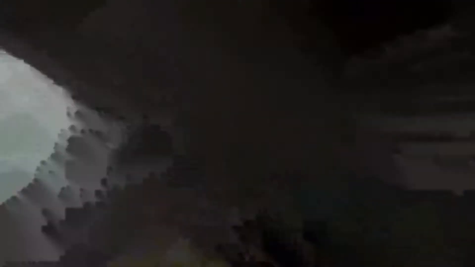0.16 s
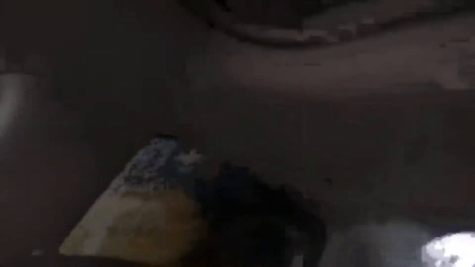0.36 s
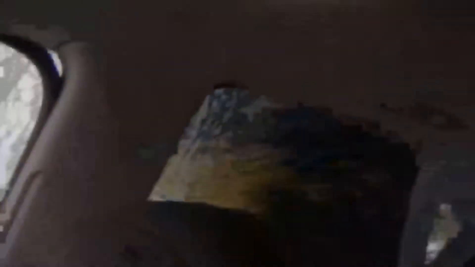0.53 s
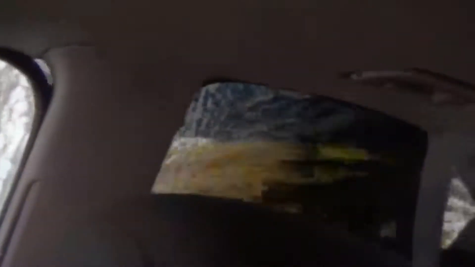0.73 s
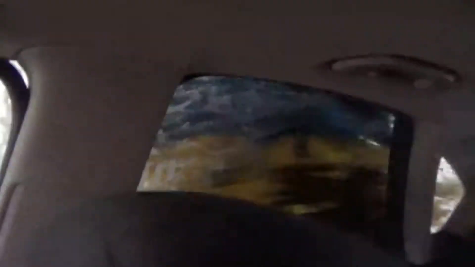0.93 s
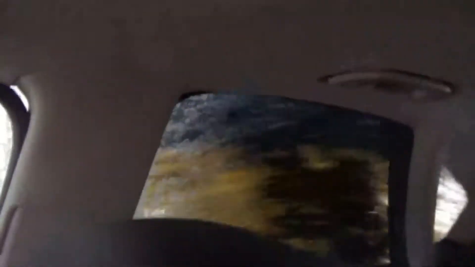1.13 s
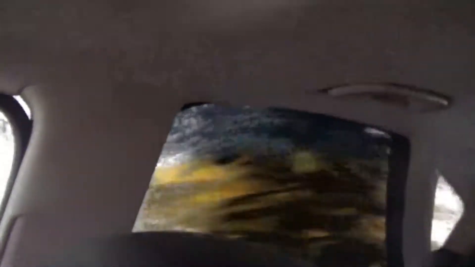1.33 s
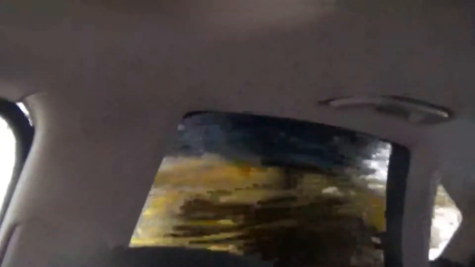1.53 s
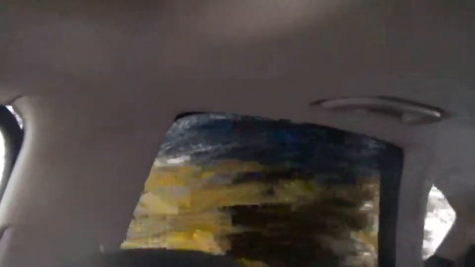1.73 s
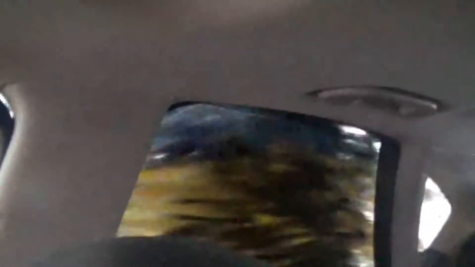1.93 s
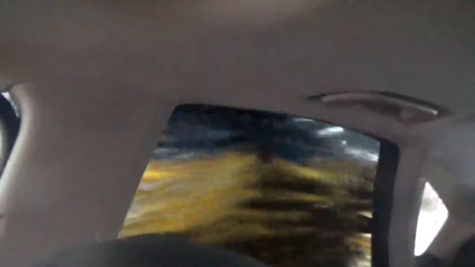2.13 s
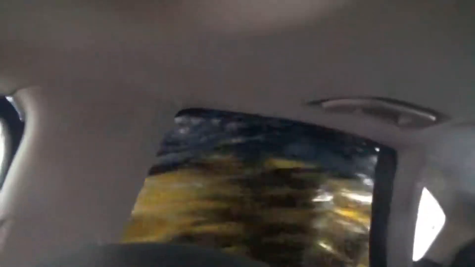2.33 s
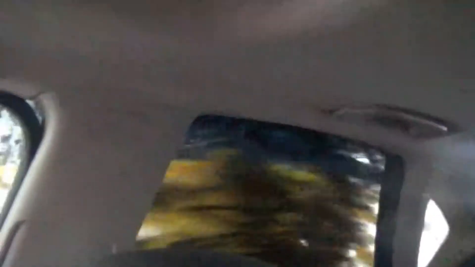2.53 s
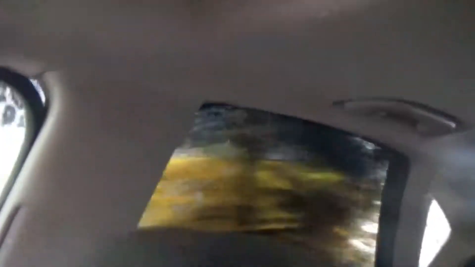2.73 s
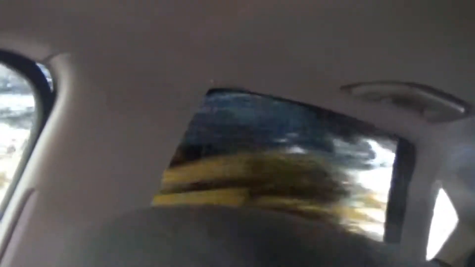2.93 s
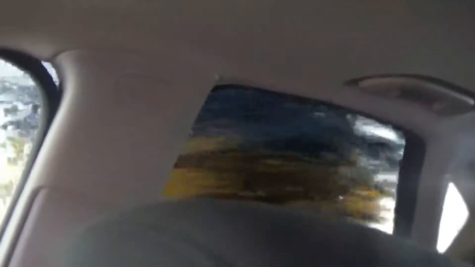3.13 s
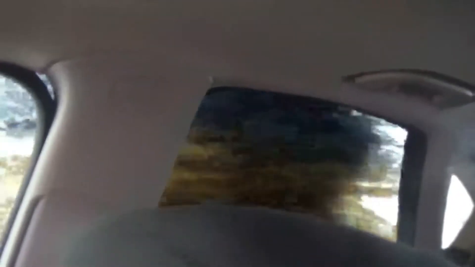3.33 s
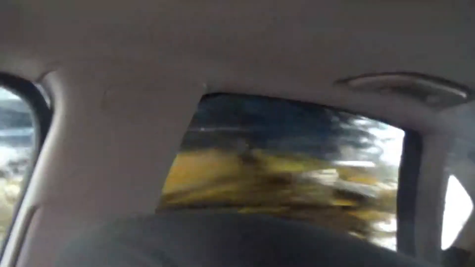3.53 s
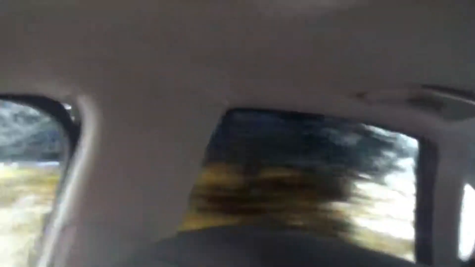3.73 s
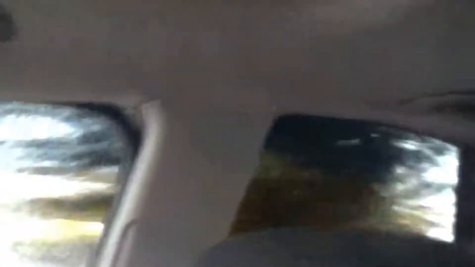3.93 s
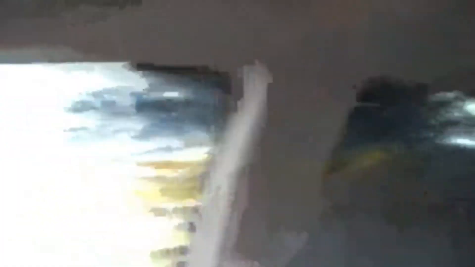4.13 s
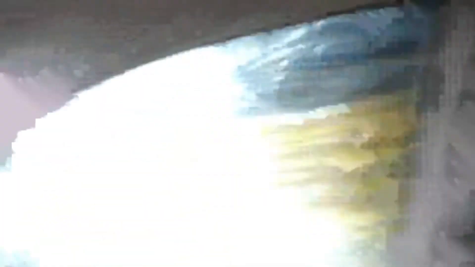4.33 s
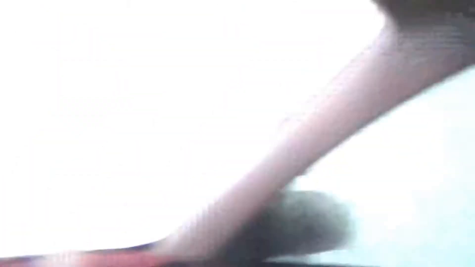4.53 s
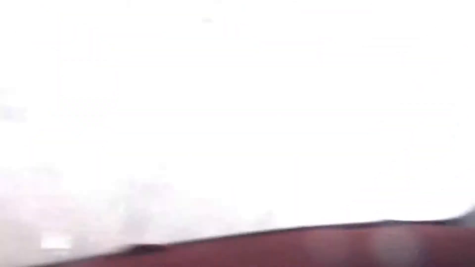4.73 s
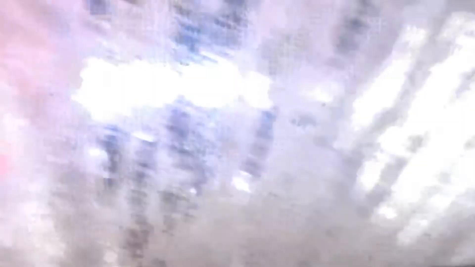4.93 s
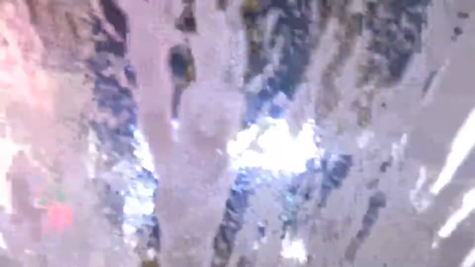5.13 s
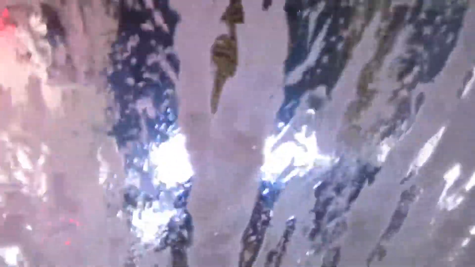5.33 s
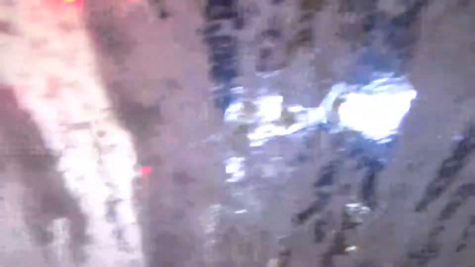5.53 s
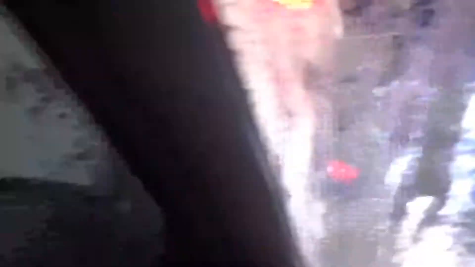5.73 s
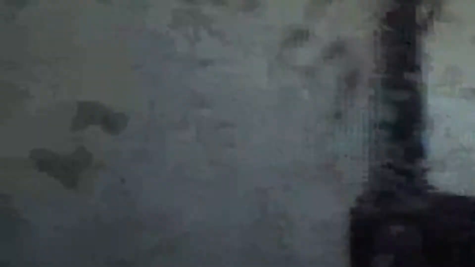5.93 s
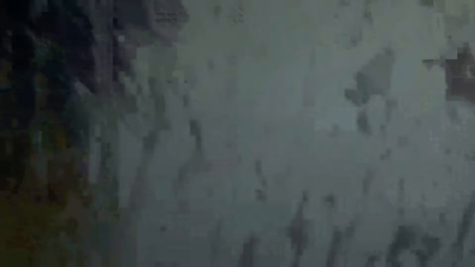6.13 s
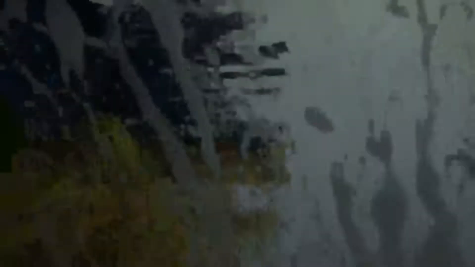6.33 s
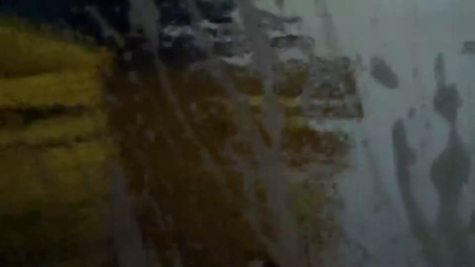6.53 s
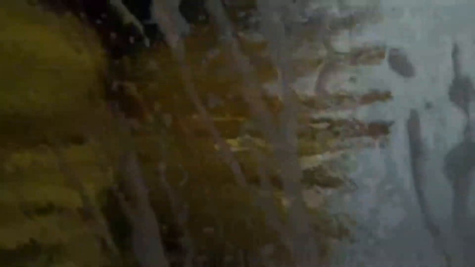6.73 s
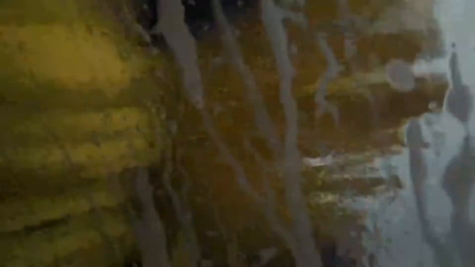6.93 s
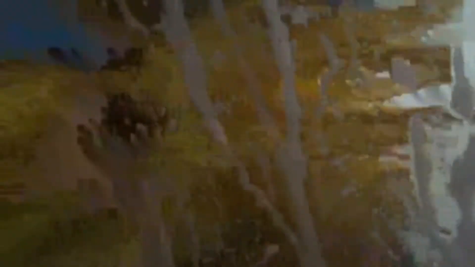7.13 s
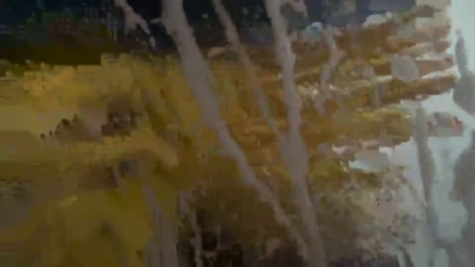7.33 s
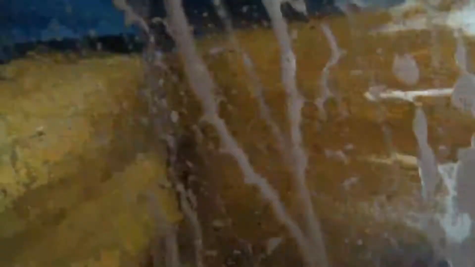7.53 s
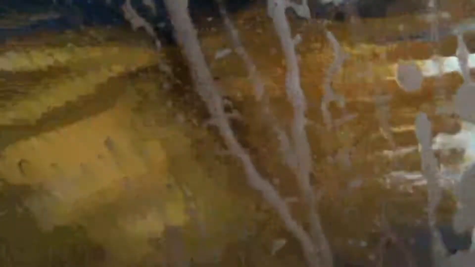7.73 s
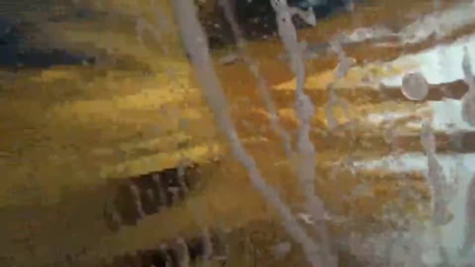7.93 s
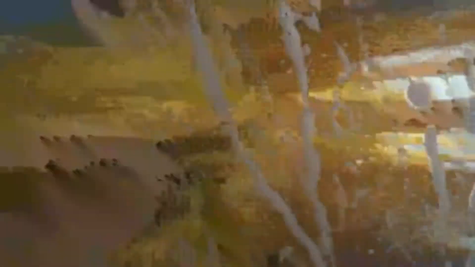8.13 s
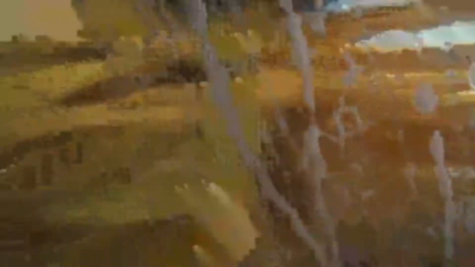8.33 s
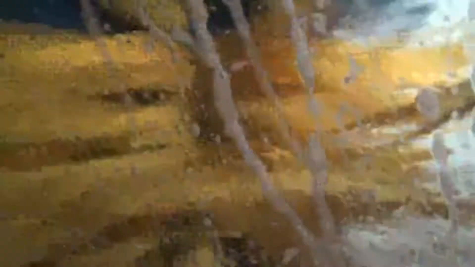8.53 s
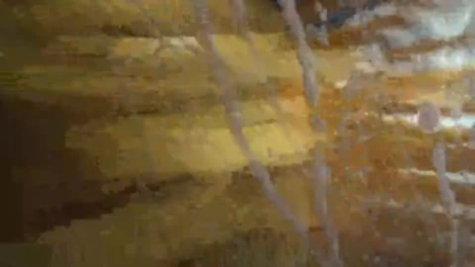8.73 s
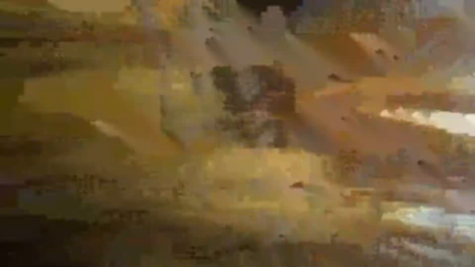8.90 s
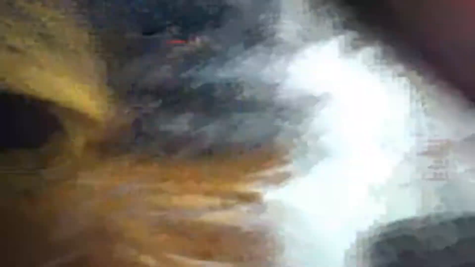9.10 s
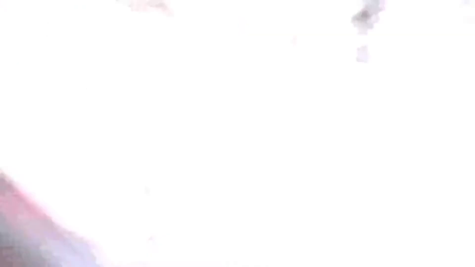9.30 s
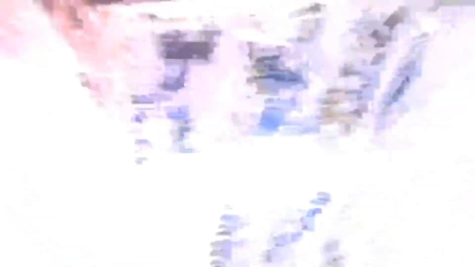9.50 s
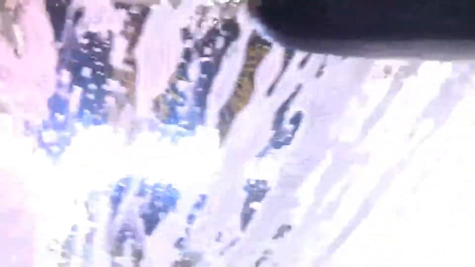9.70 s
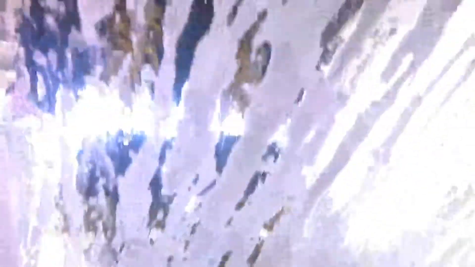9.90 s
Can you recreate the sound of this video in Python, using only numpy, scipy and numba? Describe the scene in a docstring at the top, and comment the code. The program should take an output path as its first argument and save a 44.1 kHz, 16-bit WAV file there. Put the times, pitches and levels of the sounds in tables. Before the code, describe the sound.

Inside a closed car in an automatic wash, heavy cloth strips drum the body and slap the wet rear glass with sharp snaps and crackling drops. Midway they lift off, leaving faint rustles, splashes and dry plastic ticks. Brushes then rub the door and side window, softer and duller. Low throb and running water continue beneath. Close, dense stereo handheld microphone in the cabin, loud moments squashed.

```python
"""Inside a car in an automatic wash. First, spinning cloth brushes beat the body: filtered noise drums the panels and
cabin air, strips slap, knock and scrub the wet rear glass, many slaps open with a sharp snap, drops crackle.
Midway the brushes lift off: softer rustles and splashes, and a few dry plastic ticks, modes plus a crack of noise.
Then the side brush meets the door and side glass with a softer spatter; one more tick comes near the end.
A low throb and running water, both shaped noise, last throughout; a compressor holds the level down."""
import sys
import numpy as np
from scipy import signal
from scipy.fft import rfft, irfft, next_fast_len
from scipy.io import wavfile
from scipy.ndimage import uniform_filter1d
from numba import njit

SR = 44100
rng = np.random.default_rng(int(sys.argv[2]) if len(sys.argv) > 2 else 0)


def transcribe(signal):
    """Save signal, clipped to [-1, 1], as a 16-bit WAV file at the path in sys.argv[1]."""
    frames = np.atleast_2d(signal).T
    limited = np.clip(frames, -1, 1)
    pcm = np.round(limited * 32767).astype(np.int16)
    wavfile.write(sys.argv[1], SR, pcm)


N = 439236

# Levels in the tables are relative, before the trims of each layer.
# brush contact: time_s, level_db, then over that level: door_boom_db, knock_db, scrub_db, spray_db, floor_shake_db
BRUSH_CONTACT = [(0.0, -15, -2.5, -2.5, -10, -11, -6), (0.45, -16, -2.5, -3, -13, -21, -7),
                 (0.8, -10.5, -4.5, -6, -16, -22.5, -7.5), (1.4, -14.5, -2.5, -3, -12, -13.5, -11.5),
                 (2.05, -13, -6.5, -6.5, -16, -21, -12), (2.2, -15, -10, -6.5, -14, -14, -13),
                 (2.8, -12, -8, -2.5, -16, -21.5, -9.5), (3.3, -13, -12, -1, -13, -32, -16.5),
                 (3.7, -12.5, -14.5, -4, -14, -21.5, -19), (4.2, -14.5, -2, -2.5, -11, -19, -11),
                 (4.7, -16, -8.5, -2, -10, -15.5, -4.5), (4.85, -20.5, -2, -3, -14, -24, -2),
                 (5.1, -26, -4, -2.5, -12.5, -17, -8.5), (5.33, -34, -0.5, -3.5, -17, -14, -2),
                 (5.75, -39, -2, -19, -9, 1, -6), (5.95, -33, 1, -14, -16, -15.5, -12),
                 (6.07, -31.5, -5.5, -12, -13, 0.5, -12), (6.12, -25, -3, -8, -23, -17, -11),
                 (6.19, -19, -0.5, -8, -21, -25, -9), (6.45, -20, 1, -1.5, -12, -45, -9),
                 (6.75, -19, -1.5, 4, -5, -12, -2), (7.0, -22.5, 4, 0, -8.5, -22, -11),
                 (7.35, -21, -3, -2, -15, -46, -8), (7.55, -23.5, 0.5, -0.5, -11, -28, -8),
                 (7.75, -20, 0, -3, -13.5, -43, -9), (7.95, -19.5, 1, -1.5, -12, -26, -9),
                 (8.25, -15.5, -0.5, -4.5, -14.5, -37, -18), (8.85, -16.5, 0, -5.5, -16.5, -17.5, -7),
                 (9.3, -22.5, 2.5, 0.5, -12.5, -41, -3.5), (9.45, -20.5, -4, -4, -13.5, -22, -14),
                 (9.7, -22, -2.5, -2, -13, -25, -4), (9.96, -19, -1.5, 0.5, -14.5, -15.5, -11)]
# random wander of the contact: nominal spread_db for drumming, door boom, knock, scrub, spray, floor shake
WANDER_DB = [1.36, 0.76, 1.36, 1.3, 5.2, 2.6]
WANDER_HZ = 14.0  # changes per second
# the drumming and knocking dip, or now and then lift, briefly: centre_s, change_db
DIPS = [(0.845, -7.5), (1.008, -7), (1.66, 1), (2.503, -4.5), (2.836, -8), (2.989, -11), (3.31, -5),
        (3.41, -5), (3.705, -4), (3.951, -8), (4.265, -6), (4.804, -9), (4.945, -8), (5.03, -1), (5.17, -4),
        (7.321, -4), (7.491, -4), (7.812, -7), (9.233, 1), (9.362, -2), (9.928, -8)]
DIP_S = 0.013  # from the centre to 1/e of the change in dB
# the stereo balance turns: time_s, left_minus_right_db (each layer takes a share)
BALANCE = [(0.0, 4), (0.3, -1), (0.41, 5.5), (3.61, -8), (4.47, 0.5), (5.57, 1), (6.08, -7), (6.21, -10.5),
           (9.1, -10), (9.35, 0), (9.96, 4)]
# how far the two channels differ: pitch_hz, side_under_mid_db
APART = [(25, -24), (110, -27.5), (190, -7.5), (350, -7.5), (620, -4.5), (1120, -5.5), (2000, -7.5),
         (3600, -7), (6450, -7.5), (11600, -12.5)]

# resonances of panels and cabin air: pitch_hz, width_hz, level_db
CABIN = [(121.4, 33.5, -1.5), (173.3, 22.5, -2.5), (209, 29.2, -1), (257.3, 34, 1), (319.4, 52, 0.5),
         (373.2, 67, -1), (491, 55, -7), (640, 198, -13.5)]
# resonances of the door: pitch_hz, width_hz, level_db
DOOR = [(134.8, 8.9, 6.5), (159, 13.5, 0.5), (180, 10.5, 1.5)]
# resonances of the side glass: pitch_hz, width_hz, level_db
SIDE_GLASS = [(69.6, 8.7, 1.5), (310.8, 13, 7.5), (271, 17, 0.5), (377, 19, 0.5), (496, 20, -2.5)]
# the brush moves over the side glass: time_s, glass_ringing_over_brush_level_db
ON_GLASS = [(5.8, -13), (6.4, -5), (7.0, 0), (7.5, -7.5), (8.0, 0), (8.5, -2.5), (8.9, -6), (9.4, -4),
            (9.96, -0.5)]
DOOR_FROM_S = 5.8  # wet sounds take the colour of the door from here
# resonances of the floor: pitch_hz, width_hz, level_db
FLOOR = [(25, 8.8, -7), (46.2, 25.5, -2.5), (67.4, 10.3, 5.5), (88.6, 12.3, 4.5)]

# colour of knocks at the rear: pitch_hz, level_db
KNOCK_REAR = [(240, -42), (400, -0.5), (465, -3.5), (974, -6), (1700, -18.5), (2210, -57), (3740, -120)]
# colour of knocks on the door: pitch_hz, level_db
KNOCK_DOOR = [(240, -33), (400, -2.5), (483, -1), (593, -6.5), (962, -12), (1130, -11), (1600, -23.5),
              (1700, -28), (2210, -45), (3740, -120)]
# colour of scrubbing on the rear window: pitch_hz, level_db
SCRUB_REAR = [(820, -15), (1400, -3), (1690, -1), (1880, 1.5), (2230, -4), (2730, -4), (4400, -21.5),
              (5720, -28), (9680, -120)]
# colour of scrubbing on the door: pitch_hz, level_db
SCRUB_DOOR = [(820, -13), (1400, -8), (1580, 1.5), (1840, -4), (2910, -7), (4400, -23), (5720, -47),
              (9680, -120)]
# colour of thrown water: pitch_hz, level_db
SPRAY = [(2240, -1), (3800, 3.5), (5350, -10.5), (9420, -4), (10600, -20), (11300, 3), (11500, -44),
         (15000, -72), (22000, -120)]

# strips that ring one patch of panel or window: start_s, level_db, pitch_hz
KNOCKS = [(0.191, -13, 573), (0.541, -2.5, 703), (0.841, -5, 940), (1.093, -9, 725), (1.186, -7, 657),
          (1.482, -3, 740), (1.629, -3, 730), (1.675, -11, 1290), (1.838, -3, 663), (1.937, -5, 530),
          (1.967, -5, 684), (2.128, -4, 663), (2.149, 0.5, 894), (2.319, -7, 762), (2.392, -3, 686),
          (2.533, 0, 740), (2.568, -3, 970), (2.637, 1.5, 817), (2.843, -15, 870), (3.006, -5, 475),
          (3.112, -6, 560), (3.171, -5, 840), (3.255, -3.5, 1230), (3.491, -16, 730), (3.556, -9, 853),
          (3.762, -7, 850), (4.185, -3.5, 920), (4.265, -8, 700), (4.506, -7, 614), (4.578, -7, 500),
          (4.882, -15, 577), (4.964, -17, 759), (4.985, -11, 430), (4.911, -4.5, 149), (5.086, -18, 417),
          (5.104, -13, 637), (5.137, -9, 328), (5.305, -16, 384), (6.4223, -14, 1160), (6.4742, -13, 1112),
          (6.506, -9, 1150), (6.52, -9.5, 1340), (6.628, -18, 1230), (6.668, -9, 720), (6.666, -11, 1090),
          (6.6912, -13, 1340), (6.73, -1.5, 1155), (6.74, -9, 1180), (6.784, -5, 1220), (6.8443, -4, 1180),
          (6.81, -10, 1320), (6.8871, -12, 1230), (6.919, -9, 1390), (6.921, -5, 706), (6.953, -11, 1156),
          (6.9776, -8, 1156), (6.985, -4, 690), (6.99, -12, 1114), (7.0725, -16, 1095), (7.123, -17, 1370),
          (7.1545, -19, 990), (7.222, -8, 1180), (7.2466, -12, 1130), (7.249, -11, 1595), (7.329, -14, 690),
          (7.35, -14, 1075), (7.371, -16, 1280), (7.5194, -20, 1060), (7.552, -18, 1030),
          (7.5742, -12, 895), (7.6375, -11, 1180), (7.655, -22, 1130), (7.6858, -15, 1060),
          (7.7711, -22, 1180), (7.8263, -15, 1080), (7.8873, -17, 1180), (7.9224, -8, 1137),
          (7.947, -9, 1065), (7.95, -7, 710), (7.962, -12, 1190), (7.986, -16, 1950), (8.0085, -2, 1167),
          (8.022, -12, 1230), (8.075, -10, 1170), (8.1933, -15, 1110), (8.21, -9, 1210), (8.2405, -17, 990),
          (8.2693, -8, 1140), (8.361, -7, 1090), (8.4191, -15, 1000), (8.4587, -20, 1100),
          (8.494, -18, 1180), (8.5594, -11, 1150), (8.6095, -12, 1100)]
# modes of a struck patch: pitch_ratio, level_db
PATCH_MODES = [(1, -0.5), (1.38, -6.5), (0.615, -7), (1.12, -10)]
KNOCK_MS, MODE_DB, PATCH_DETUNE = 11.6, -7.5, 0.16  # three times the rise; strongest mode; full range of ratio
KNOCK_ROUGH_DB, KNOCK_GRAIN_HZ = 3, 350.2  # cloth drags unevenly: nominal spread, changes per second

# colour of flung drops: pitch_hz, level_db
DROPS = [(1200, -30), (2500, 0.5), (4000, -5.5), (6000, -15.5), (9000, -21), (11000, -23), (13000, -30)]
DROPS_PER_S, DROP_DB, DROP_SCATTER_DB, DROP_MS = 300, -14, 5, 0.88  # the last is the fade to 1/e

# colour of water running off: pitch_hz, level_db
RUNNING_WATER = [(290, -32), (500, -1), (817, -2), (1560, -17), (4220, -37), (4620, -27), (7660, -29),
                 (11000, -25), (14300, -53), (22000, -120)]
# resonance of the low throb: pitch_hz, width_hz, level_db
THROB = [(28, 5, 0)]
WATER_DB, THROB_DB = -45, -37  # rms levels before the compressor

# slaps of strips, loud to faint, with softer rustles and splashes in the lull:
# time_s (just before the peak), level_db, wet_top_db, crack_hz, length_ms (scaled per part), body_db
SLAPS = [(0.0667, -4, -16, 1820, 6.4, 0), (0.0994, -16, -14, 2010, 6.6, 2),
         (0.1366, -16, -3.5, 2740, 8.7, 2), (0.1494, -19, -5, 2460, 9.7, 4),
         (0.218, -9.5, -22, 2440, 12, 2), (0.2399, -19, -8, 2150, 6.3, 0), (0.3177, -25, -12, 1980, 8, 2),
         (0.3371, -11, -15, 1850, 7.2, 2), (0.558, -20, -8, 2400, 4, 0), (0.5891, -12, -12, 1820, 8, -1),
         (0.6654, -12, -13, 1850, 11, 2), (0.7094, -20, -12, 1910, 8, 2), (0.739, -15, -13, 2400, 6, 2),
         (0.7706, -1.5, -28, 2620, 12.3, 5), (0.8194, -14, -12, 2360, 12.5, 5),
         (0.856, -25, -15, 2880, 7.2, 2), (0.8724, -5.5, -16, 2440, 6.7, -3), (0.885, -19, -4, 2600, 4, 0),
         (0.9193, -30, -17, 1860, 7, 0), (1.0221, -29, -22, 2680, 8, 2), (1.068, -10, -16, 2370, 7.3, -6),
         (1.1194, -26, -19, 1810, 8, 0), (1.1867, -22, -14, 2050, 10, 2), (1.2012, -12, -9, 2400, 6, 2),
         (1.2251, -8.5, -16, 2490, 9.3, 8), (1.2496, -10.5, -9, 3370, 6.8, 10),
         (1.3304, -11.5, -15, 2940, 11, 2), (1.3633, -8, -19, 1810, 8, 0), (1.4117, -8, -27, 1830, 17, 9),
         (1.5194, -10, -13, 1800, 8, 0), (1.5825, -9, -26, 3300, 8.8, 1), (1.635, -17, -10, 2400, 8, 0),
         (1.726, -15, -15, 3600, 8, 0), (1.786, -23, -17, 2600, 7.2, 0), (1.857, -9.5, -4.5, 2450, 7.4, 4),
         (1.866, -8, -18, 2600, 10, 5), (1.8966, -9, -18, 2470, 5, 6), (1.918, -9, -22, 2200, 5, 2),
         (1.953, -18, -12, 3000, 20, 0), (1.985, -18, -7, 3200, 5, 0), (2.0, -18, -15, 2500, 7.1, 2),
         (2.045, -24, -16, 3000, 7.1, 0), (2.0855, -7, -32, 2630, 8.9, 5), (2.152, -11, -17, 2860, 6.4, 10),
         (2.1735, -21, -5, 2400, 6, 2), (2.2696, 2, -23, 1850, 5.2, -5), (2.36, -12, -20, 2520, 18, -2),
         (2.4399, -13, -14, 2400, 6, 5), (2.4798, -11, -23, 3150, 3.7, 13), (2.5272, -18, -18, 2360, 5, 2),
         (2.5706, -12, -19, 1870, 9.8, 2), (2.615, -6.5, -17, 2780, 13, 10),
         (2.6918, -13, -22, 2520, 13, 2), (2.7766, -9.5, -35, 2530, 17, -2),
         (2.8983, -16, -21, 2510, 18, 6), (2.9294, -9.5, -13.5, 2000, 21, 11),
         (2.8047, -12, -31, 2600, 7.2, 0), (2.978, -19.5, -23, 3300, 8.2, 0),
         (3.0011, -21, -26, 2480, 7.2, 2), (3.024, -23, -21, 2800, 6.3, 0),
         (3.1188, -27, -12, 4500, 4.2, 0), (3.136, -23, -7, 2600, 10, 2), (3.1716, -12, -14, 2480, 8.9, 2),
         (3.186, -13, -18, 2580, 6.2, 4), (3.2321, -13, -13, 2600, 8.3, 2), (3.284, -9, -17, 2400, 11, 9),
         (3.3802, -14, -16, 2820, 7.3, 16), (3.391, -7, -30, 2530, 7.7, 0),
         (3.4406, -17, -11, 2970, 5.8, 2), (3.4565, -6, -31, 2370, 5.5, -4),
         (3.5627, -9, -5.5, 2530, 9.3, -2), (3.6731, -7.5, -26, 2660, 6.1, 4),
         (3.7264, -19, -11, 2490, 8, 2), (3.7758, -9.5, -16, 2160, 11, -1),
         (3.8227, -7.5, -20, 2530, 13, 6), (3.9275, -2.5, -12, 2660, 5.9, 0),
         (3.9694, -8, -29, 2100, 6.6, 6), (4.0417, -3.5, -27, 1850, 7.8, -2),
         (4.0946, -5, -22, 2070, 14, 3), (4.2622, -24, -10, 2640, 7.3, 2), (4.328, -20, 0, 2060, 9.8, 2),
         (4.3635, -23, -19, 2250, 8, 2), (4.5445, -9.5, -14, 4100, 11, -4), (4.574, -13, -9, 2390, 7.1, 9),
         (4.721, -22, 5, 1940, 6.3, -4), (4.7633, -4, -10, 3300, 6, -12), (4.771, -6, -16, 2200, 6, -8),
         (4.815, -28, -12, 2800, 4.4, 2), (4.8878, -13.5, -13, 2310, 6.5, 11),
         (4.9684, -18, -21, 2110, 8.9, 6), (5.1437, -18, -26, 2100, 6.8, 2), (5.27, -33, -23, 2400, 10, 7),
         (5.3512, -31, -18, 3000, 6, 0), (5.366, -28, -22, 2500, 14, -3), (5.3941, -27, -14, 1920, 8, 0),
         (5.416, -26, -18, 1900, 7, 0), (5.444, -28, -22, 1800, 8, -1), (5.5079, -32, -19, 2230, 11, 0),
         (5.585, -44, -14, 3000, 8, -4), (5.912, -31, -18, 2700, 9, 0), (5.9224, -38, -16, 3300, 9.2, -2),
         (5.936, -34, -20, 2800, 14, -6), (6.0184, -36, -12, 3900, 18, -4), (6.195, -24, -20, 2200, 16, 2),
         (6.232, -24, -18, 2600, 16, 2), (6.4108, -18, -24, 1970, 8, 2), (6.6904, -21, -6, 1840, 7.4, 10),
         (6.8394, -10.5, -23, 1850, 9.1, 9), (6.977, -15, -32, 2030, 8.6, 16),
         (7.3382, -23, -23, 2860, 8, 2), (7.5294, -30, -22, 1870, 8, 2), (7.5894, -34, -20, 2410, 7.1, 2),
         (7.863, -22, -14, 2070, 8, 0), (7.9039, -17, -19, 1850, 8, 2), (7.9598, -16, -18, 2040, 8.7, 5),
         (8.1105, -19, -13, 1830, 8, 0), (8.2501, -14, -18, 1850, 8, 4), (8.5609, -19.5, -18, 2720, 11, 9),
         (8.6393, -20, -10, 2050, 8, 0), (8.6877, -14, -22, 2500, 19, -3),
         (8.8573, -19, -20, 2240, 9.9, 16), (8.9511, -29, -19, 2850, 8, 2), (9.0912, -19, -22, 2430, 8, 2),
         (9.1775, -18, -23, 2030, 17, 4), (9.2239, -15, -16, 2280, 10, 1), (9.2843, -21, -19, 2970, 11, 2),
         (9.3891, -20, -25, 2110, 7.4, 2), (9.4, -23, -22, 3300, 8, 0), (9.4695, -15, -13, 4030, 4.1, 5),
         (9.476, -15.5, -5, 3000, 4, 2), (9.7507, -17, -24, 1800, 8, 0), (9.8206, -20, -15, 2910, 9.7, 7),
         (9.866, -17, -23, 2160, 8.7, 0)]
# colour of the dull body of a slap: pitch_hz, level_db
SLAP_BODY = [(500, -28), (900, 1), (1200, 10), (1700, -9), (2600, -51.5)]
# colour of the crack of a slap: pitch_hz, level_db
SLAP_CRACK = [(1400, -3.5), (2200, -1), (3200, 1.5), (4800, -3.5), (6500, -10.5), (8000, -26)]
# colour of the wet top of a slap: pitch_hz, level_db
SLAP_TOP = [(3800, 3), (5500, 3.5), (8000, 5.5), (11000, 2.5), (13000, -6)]

# short sharp snaps, many at the front of a slap: peak_s, level_db, left_minus_right_db, fade_ms
SNAPS = [(0.0662, -22, 1.0, 1.6), (0.0957, -21, -1.0, 1.6), (0.1376, -18, 0.5, 1.6),
         (0.2169, -26, -1.0, 1.6), (0.2399, -25, 0.5, 1.6), (0.3182, -23, -1.0, 1.6),
         (0.5881, -27, 0.0, 1.6), (0.6654, -14, 0.0, 1.7), (0.7043, -17, -0.5, 1.6),
         (0.7272, -30, 1.5, 1.6), (0.7392, -27, 0.0, 1.6), (0.7642, -24, 0.0, 1.6),
         (0.8225, -26, -0.5, 1.6), (0.853, -27, -1.0, 1.6), (0.9303, -26, -1.0, 1.6),
         (1.0675, -23, 0.5, 1.6), (1.1144, -19, 1.5, 1.6), (1.1837, -29, -0.5, 1.6),
         (1.2012, -24, 0.0, 1.6), (1.2246, -24, -0.5, 1.6), (1.2486, -22, 0.0, 1.6),
         (1.2855, -18, 0.0, 1.6), (1.33, -14, 0.0, 1.6), (1.3613, -24, 0.0, 1.6), (1.5209, -21, 0.0, 1.6),
         (1.8568, -7, -1.0, 1.8), (2.0852, -31, 0.0, 1.6), (2.1181, -26, 0.0, 1.6), (2.152, -23, 0.5, 1.6),
         (2.1735, -28, 0.0, 1.6), (2.2722, -23, 0.0, 1.6), (2.358, -26, 0.0, 1.6), (2.4324, -27, 0.5, 1.6),
         (2.4793, -26, 0.0, 1.6), (2.5272, -26, 0.5, 1.6), (2.5701, -24, -0.5, 1.6), (2.613, -17, 0.0, 1.6),
         (2.6878, -31, -1.0, 1.6), (2.9322, -19, 2, 1.6), (3.1173, -29, -0.5, 1.6),
         (3.1702, -30, -1.5, 1.6), (3.2321, -25, -0.5, 1.6), (3.4416, -26, -1.5, 1.6),
         (3.5628, -14, -3.0, 1.6), (3.6711, -27, -4.0, 1.6), (3.7708, -29, -3.0, 1.6),
         (3.927, -18, -2.0, 1.6), (3.9719, -27, 0.5, 1.6), (4.2622, -28, 0.0, 1.6), (4.3316, -23, 0.0, 1.6),
         (4.5414, -14, -1.5, 1.6), (4.7217, -19, 0.5, 1.6), (4.7606, -15, 0.0, 1.6), (4.815, -28, 0.5, 1.6),
         (4.8873, -26, 1.0, 1.6)]
# colour of the snaps: pitch_hz, level_db
SNAP_COLOUR = [(1200, -25), (2500, -3), (4500, 5), (8000, -2), (11000, -10), (12000, -25)]
SNAP_DB = -5

# dry ticks close by: start_s, level_db, low_modes_db, top_modes_and_crack_db, left_minus_right_db, ring_length_factor
TICKS = [(5.4874, -45, 10, -17, -3.0, 1), (5.6224, -12.5, -9, -11, 3, 0.58),
         (5.6497, -30, -3, -22, 1.5, .8), (5.6563, -34, -9, -10, 1.5, .5), (5.659, -20, -12, -4.5, 6, 0.72),
         (5.7013, -32.5, 12, -17, -8, 1), (5.768, -23, -6, -13, 1.5, 0.95), (5.776, -37, 1, -4, 1.5, 1),
         (6.049, -36, 10, -20, 8, .6), (6.054, -31.5, 19, -8, 8, 0.65), (6.0554, -41, 27, -12, 10, 0.5),
         (6.0729, -20.5, -24, 3, 0, 0.38), (6.075, -32, -24, 3, -0.5, .7),
         (9.361, -14, -9, -10, -1.0, 0.83)]
# modes of the plastic: pitch_hz, level_db, t60_s (at a length factor of 1)
PLASTIC = [(780, -7.5, 0.031), (1210, -19, .025), (1830, -8.5, 0.035), (2300, -10, 0.008),
           (2780, -8, 0.015), (3540, -26, 0.0093), (4360, -16, 0.0032), (5600, 7, 0.0049), (8060, -8, .01),
           (9100, 4, 0.007)]

CEILING_DB, RATIO = -8.5, 3.17  # compressor threshold and ratio
LEFT_LAG_S, TOP_HZ = 0.00002, 11000


def undb(db):
    """Decibels to amplitude factor."""
    return 10 ** (np.asarray(db) / 20)


def unit(x):
    """Scale to rms 1."""
    return x / np.sqrt(np.mean(x ** 2))


def colour(x, points):
    """Shape a sound by (Hz, dB) points, straight on a log frequency axis."""
    hz, db = np.transpose(points)
    size = next_fast_len(N)
    f = np.maximum(np.arange(size // 2 + 1) * SR / size, 1)
    gain = undb(np.interp(np.log(f), np.log(hz), db))
    return irfft(rfft(x, size) * gain, size)[..., :N]


def ring(x, modes):
    """Sum of resonances; alternate signs keep the valleys dark."""
    total = 0
    for k, (hz, width, db) in enumerate(modes):
        b, a = signal.iirpeak(hz, hz / width, SR)
        total = total + (-1) ** k * undb(db) * signal.lfilter(b, a, x)
    return total


def wide():
    """Stereo noise: channels alike in the bass, less so higher up."""
    mid, side = rng.standard_normal((2, N))
    side = colour(side, APART)
    return np.array([mid + side, mid - side])


def left_right(balance_db):
    """Split a left-minus-right level evenly over both channels, in dB."""
    return np.array([balance_db, -balance_db]) / 2


def stroke(rise_ms, fall_ms):
    """Swell to a point at the middle of 100 ms, then fade, both exponential."""
    ms = np.arange(-SR // 20, SR // 20) / SR * 1000
    return np.exp(np.where(ms < 0, ms / rise_ms, -ms / fall_ms))


def walk(rate):
    """Random levels held 1 / rate s and smoothed twice; spread about 0.8."""
    hold = int(SR / rate)
    steps = np.repeat(rng.standard_normal(N // hold + 1), hold)
    return 1.1 * uniform_filter1d(uniform_filter1d(steps, hold), hold)[:N]


def strips(rate, scatter_db, rise_ms, fall_ms, steady):
    """Loudness of many cloth strips landing at random, over a steady share of the power; rms near 1."""
    size = undb(2 * scatter_db * np.minimum(rng.exponential(size=N), 3))
    hits = (rng.random(N) < rate / SR) * size
    power = signal.fftconvolve(hits, stroke(rise_ms, fall_ms), "same").clip(0)
    return np.sqrt(np.clip(steady, 0, 1) + np.clip(1 - steady, 0, 1) * power / power.mean())


def drumming(level_db, door_db):
    """Soft random blows excite resonances of panels and cabin air, door and, later, side glass."""
    push = strips(rate=60.0, scatter_db=0.0, rise_ms=3.2, fall_ms=15.0, steady=0.55)
    panels = unit(ring(wide() * push, CABIN)) * undb(level_db - 1.0)
    blows = wide() * push
    glass_db = np.interp(np.arange(N) / SR, *np.transpose(ON_GLASS), left=-90)
    glass = unit(ring(blows, SIDE_GLASS)) * undb(level_db + glass_db)
    door = unit(ring(blows, DOOR)) * undb(level_db + 1.76 * door_db + 2.5)
    return panels + glass + door


def washing(level_db, knock_db, scrub_db, spray_db):
    """Landing strips modulate noise: knocked metal, scrubbed glass, thrown water, coloured by place."""
    contact = np.clip((level_db + 48.0) / 10, 0, 1)  # the faintest contact sounds more even
    land = strips(rate=40.0, scatter_db=3.0, rise_ms=2.3, fall_ms=6.0, steady=0.2) ** contact
    drops = strips(rate=27.0, scatter_db=2.5, rise_ms=0.54, fall_ms=2.2, steady=0.47) ** contact
    door = np.arange(N) > DOOR_FROM_S * SR
    wetness = np.where(door, 0.55, 1)  # foam on the door softens the spatter

    knock = wide() * land ** 0.45
    knock = np.where(door, unit(colour(knock, KNOCK_DOOR)), unit(colour(knock, KNOCK_REAR)))
    scrub = wide() * land ** 0.5 * drops ** (0.13 * wetness)
    scrub = np.where(door, unit(colour(scrub, SCRUB_DOOR)), unit(colour(scrub, SCRUB_REAR)))
    spray = wide() * (land ** 0.5 * drops ** 0.98) ** wetness
    spray = unit(colour(spray, SPRAY))

    mix = knock * undb(knock_db - 0.15) + scrub * undb(scrub_db - 1.0) + spray * undb(spray_db - 7.5)
    return mix * undb(level_db)


def knocks(near_db):
    """Pitched rubs, clear ones by the table and weaker ones by chance: each a small cluster of sine modes."""
    chance = rng.random((700, 3))
    s = chance[:, 0] * (N - 1) / SR
    weak_db = near_db[(s * SR).astype(int)] - 3.0 + 4 * chance[:, 1]
    weak_hz = 420 * 3.5 ** chance[:, 2] ** 1.293
    weak = np.transpose([s, weak_db, weak_hz, 9 + 8 * chance[:, 1]])
    clear = [(s, db + MODE_DB, hz, KNOCK_MS) for s, db, hz in KNOCKS]
    rows = np.vstack([clear, weak])

    out, t = np.zeros((2, N + SR)), np.arange(SR // 16) / SR
    step, mode_db = np.transpose(PATCH_MODES)[..., None, None]
    variation = rng.random((len(rows), 3, 4, 1, 1))
    for (s, db, hz, ms), (turn, apart, spread) in zip(rows, variation):
        rise = t * 3000 / ms  # reaches 1, the peak, at a third of the length
        env = rise * np.exp(1 - rise)
        # random phase, a little apart between left and right
        phase = 2 * np.pi * turn + 2.36 * (apart - 0.5) * np.array([[0], [1]])
        ratio = step * (1 + PATCH_DETUNE * (step != 1) * (spread - 0.5))
        modes = undb(mode_db) * np.sin(2 * np.pi * hz * ratio * t + phase)
        start = int(s * SR)
        out[:, start:start + len(t)] += undb(db) * env * modes.sum(axis=0)
    return out[:, :N] * undb(KNOCK_ROUGH_DB * walk(KNOCK_GRAIN_HZ) - 1.5)


def spatter(near_db):
    """Single drops and bristle tips crackle on glass: short noise grains, each with its own balance."""
    scatter = undb(DROP_SCATTER_DB * np.minimum(rng.exponential(size=N), 3))
    size = (rng.random(N) < DROPS_PER_S / SR) * scatter
    hits = size * undb(left_right(4 * rng.standard_normal(N)))
    grains = signal.fftconvolve(hits, stroke(0.17, DROP_MS)[None], "same")
    return unit(colour(grains * wide(), DROPS)) * undb(near_db + DROP_DB)


def floor_shake(level_db):
    """Mostly central noise excites the low resonances of the floor."""
    mid, side = rng.standard_normal((2, N))
    push = mid + 0.28 * side * np.array([[1], [-1]])
    return unit(ring(push, FLOOR)) * undb(level_db)


def low_throb():
    """Noise through one narrow low resonance throbs without a stop."""
    return unit(ring(rng.standard_normal(N), THROB)) * undb(THROB_DB)


def running_water():
    """Water running off is a steady hiss of coloured noise."""
    return unit(colour(wide(), RUNNING_WATER)) * undb(WATER_DB)


def slaps(near_db):
    """Wet bursts, loud to faint: resonant noise crack, dull body, pointed top; small splats land by chance."""
    chance = rng.random((650, 3))
    s = 0.008 + chance[:, 0] * (N / SR - 0.02)
    size_db = near_db[(s * SR).astype(int)] + 1.0 + 6 * chance[:, 1] ** 2 - 5 * (s > DOOR_FROM_S)
    crack_hz = 2000 * 2.5 ** chance[:, 2] ** 2.6
    small = np.transpose([s, size_db, -14 + 0 * s, crack_hz, 3 + 4 * chance[:, 1], -9 + 0 * s])

    half = SR // 20
    shape, cracks = np.zeros((2, N + SR)), np.zeros((2, N + SR))  # shape: body and top loudness
    glass = np.pad(unit(colour(wide(), SLAP_CRACK)), ((0, 0), (0, SR)))
    sharpness = np.array([[0.8], [1.2], [2.8]])  # body, crack, top
    for s, db, top_db, hz, ms, body_db in np.vstack([SLAPS, small]):
        body_env, crack_env, top_env = stroke(0.85 * ms, 1.1 * ms) ** sharpness
        first = int((s + 0.00023 * ms) * SR)
        span = slice(first, first + 2 * half)
        shape[0, span] += undb(db + body_db - 20.5) * body_env
        shape[1, span] += undb(db + top_db - 4.5) * top_env
        piece = glass[:, span]
        b, a = signal.iirpeak(hz, 6.0, SR)
        piece = 0.22 * piece + 1.45 * signal.lfilter(b, a, piece)
        cracks[:, span] += undb(db - 8.5) * crack_env * piece

    body_env, top_env = shape[:, half:N + half]  # the swell comes before, the peak just after each time
    body = body_env * unit(colour(wide(), SLAP_BODY))
    top = top_env * unit(colour(wide(), SLAP_TOP))
    return body + top + cracks[:, half:N + half]


def snaps():
    """Short sharp snaps, many at the front of a slap: broad noise with a very fast rise and a short fade."""
    env, half = np.zeros((2, N + SR)), SR // 20
    for s, db, balance_db, ms in SNAPS:
        first = int(s * SR)
        gain = undb(db + SNAP_DB + left_right(balance_db))[:, None]
        env[:, first:first + 2 * half] += gain * stroke(0.15, max(ms, 0.5))
    return env[:, half:N + half] * unit(colour(wide(), SNAP_COLOUR))


def ticks():
    """Hard little blows: a dry crack of noise and brief plastic modes, a little detuned each time."""
    hz, mode_db, t60 = np.transpose(PLASTIC)[..., None]
    out, t = np.zeros((2, N + SR)), np.arange(SR // 16) / SR
    for s, db, low_db, top_db, balance_db, length in TICKS:
        group_db = np.where(hz < 2000, low_db, np.where(hz > 5000, top_db, 0))
        vary_level, vary_pitch, vary_phase = rng.random((3, len(hz), 1)) - 0.5
        fall_db = -60 * t / length  # divided by t60 below
        gain = undb(mode_db + group_db + 5.2 * vary_level + fall_db / t60)
        phase = hz * (1 + 0.055 * vary_pitch) * t + 0.36 * vary_phase  # in cycles
        modes = gain * np.sin(2 * np.pi * phase)

        # differences thin the bass, short averages soften the top
        noise = rng.standard_normal((2, len(t) + 8))
        snap = uniform_filter1d(noise[0, 8:] - noise[0, :-8], size=5)
        snap = snap * undb(2.5 + fall_db / 0.029)
        crack = uniform_filter1d(noise[1, 3:] - noise[1, :-3], size=2)[:len(t)]
        crack = crack * undb(top_db + 2 + fall_db / 0.023)

        start = int(s * SR)
        gain = undb(db - 2.0 + left_right(balance_db))[:, None]
        out[:, start:start + len(t)] += gain * (modes.sum(axis=0) + snap + crack)
    return out[:, :N]


def scene():
    """Brush layers follow the wandering contact and balance; throb, water, snaps and ticks are added."""
    now = np.arange(N) / SR
    s, *columns = np.transpose(BRUSH_CONTACT)
    level_db, *layers = (np.interp(now, s, column) for column in columns)
    wandering = [db + spread * walk(WANDER_HZ) for db, spread in zip([0, *layers], WANDER_DB)]
    beat, door, knock, scrub, spray, shake = wandering
    dip = sum(db * np.exp(-((now - at) / DIP_S) ** 2) for at, db in DIPS)
    beat, knock = beat + dip, knock + 0.99 * dip
    balance_db = left_right(np.interp(now, *np.transpose(BALANCE)))

    drums = drumming(level_db + beat, door)
    wet = washing(level_db, knock, scrub, spray)
    wet = wet + knocks(level_db + knock - 4.0)
    # drops thin out faster than the rest as contact weakens
    wet = wet + spatter(level_db + spray + 8.0 + 3 * np.minimum(level_db + 26.5, 0))
    wet = wet + slaps(level_db + scrub)
    # the balance turns less in the bass than in the middle range
    brush = drums * undb(0.17 * balance_db) + wet * undb(0.4 * balance_db)
    steady = low_throb() + running_water()
    return brush + floor_shake(level_db + shake) + steady + snaps() + ticks()


@njit
def follow(x, attack, release):
    """Envelope that rises fast and falls slowly."""
    y, e = np.empty(len(x)), 0.0
    for i in range(len(x)):
        e += (x[i] - e) * (attack if x[i] > e else release)
        y[i] = e
    return y


def record(dry):
    """A compressor turns down loud moments, peaks are rounded, the left lags and the top is cut."""
    attack_s, release_s = 0.00094, 0.06
    loud = follow(np.abs(dry).max(axis=0), 1 / (attack_s * SR), 1 / (release_s * SR))
    wet = dry * np.minimum(undb(CEILING_DB) / (loud + 1e-9), 1) ** (1 - 1 / RATIO)
    wet = wet / (1 + wet ** 4) ** (1 / 4)
    # a phase slope delays the left by less than one sample
    size = next_fast_len(N)
    f = SR * np.arange(size // 2 + 1) / size
    wet[0] = irfft(rfft(wet[0], size) * np.exp(-2j * np.pi * LEFT_LAG_S * f), size)[:N]
    low_pass = signal.firwin(401, TOP_HZ, window=("kaiser", 5), fs=SR)
    return signal.fftconvolve(wet, low_pass[None], "same")


dry = scene()
out = record(dry)
transcribe(out)
```